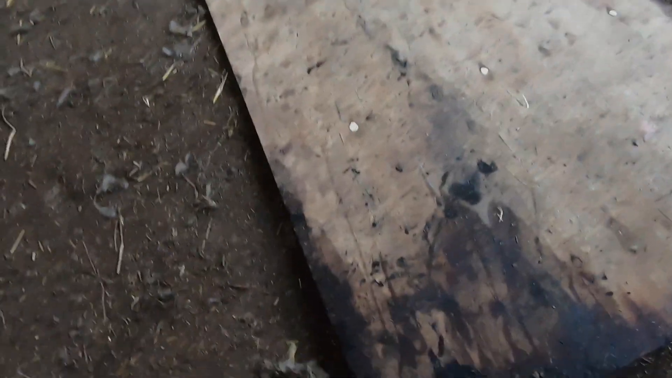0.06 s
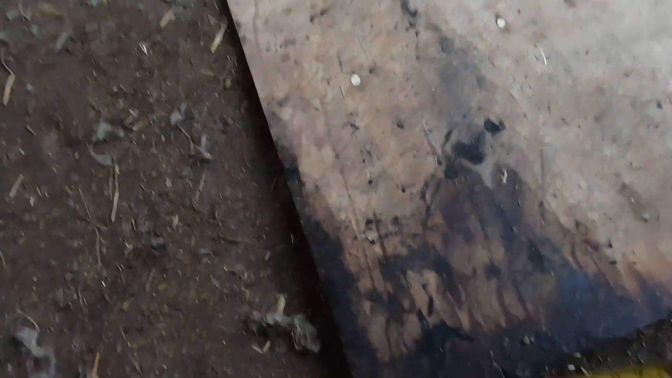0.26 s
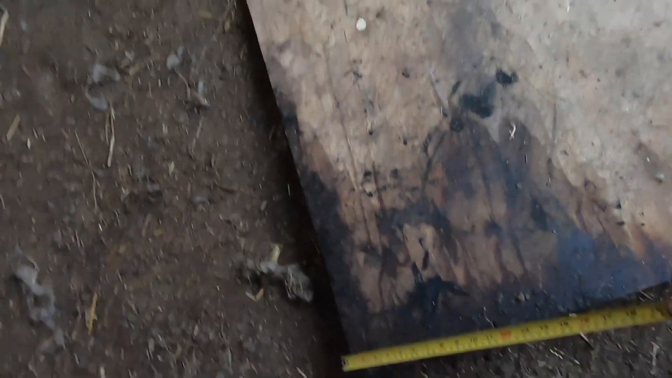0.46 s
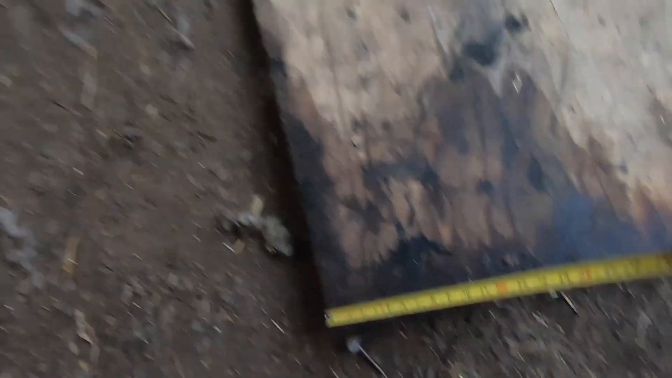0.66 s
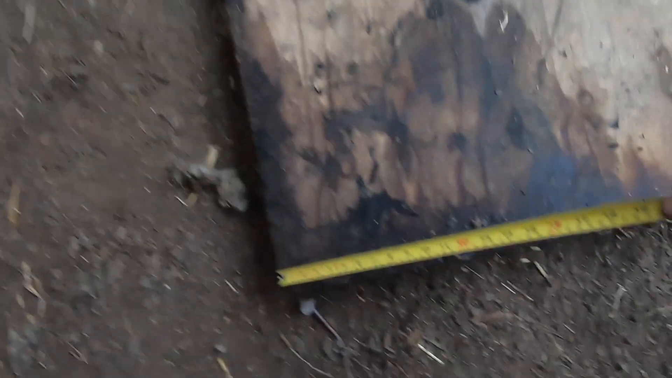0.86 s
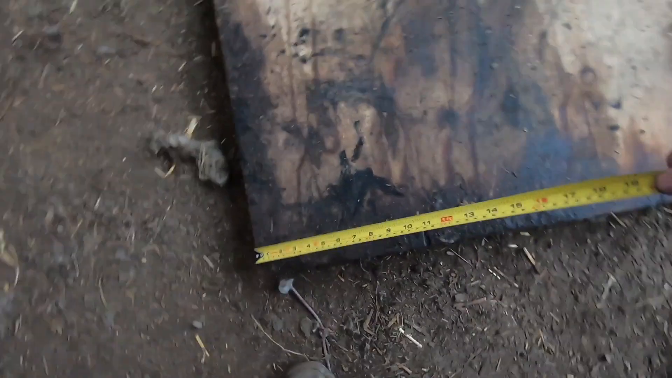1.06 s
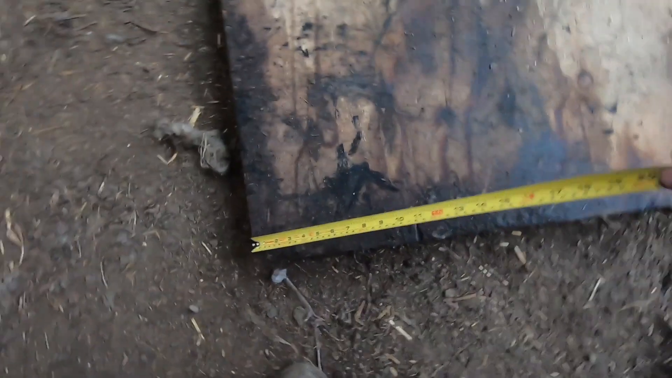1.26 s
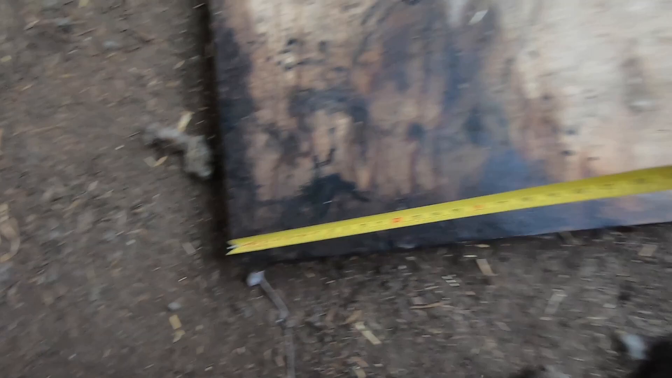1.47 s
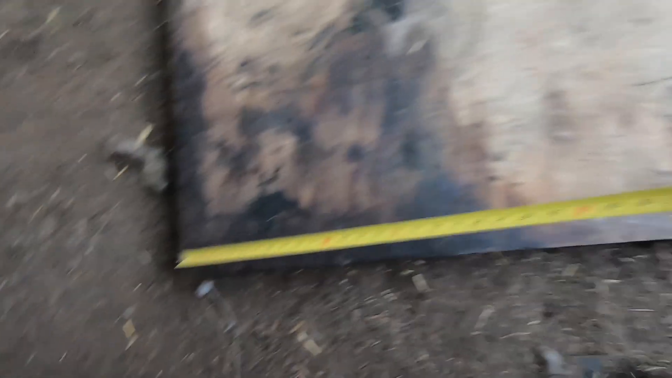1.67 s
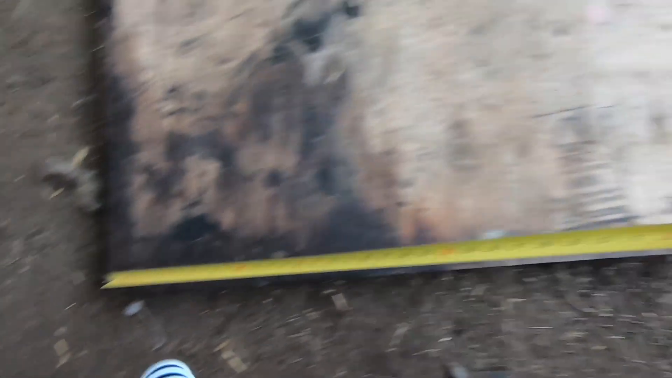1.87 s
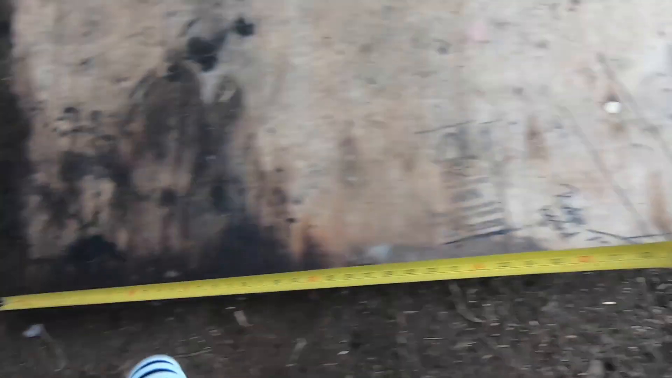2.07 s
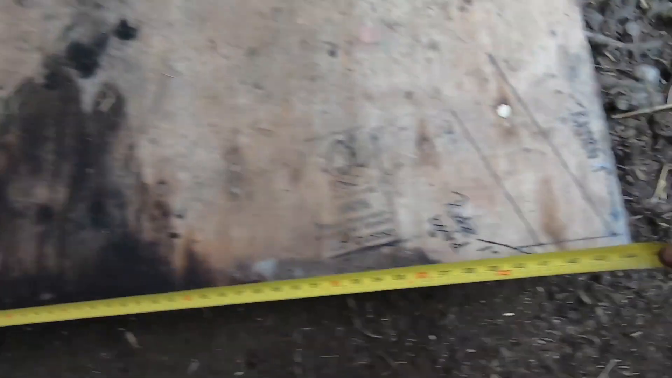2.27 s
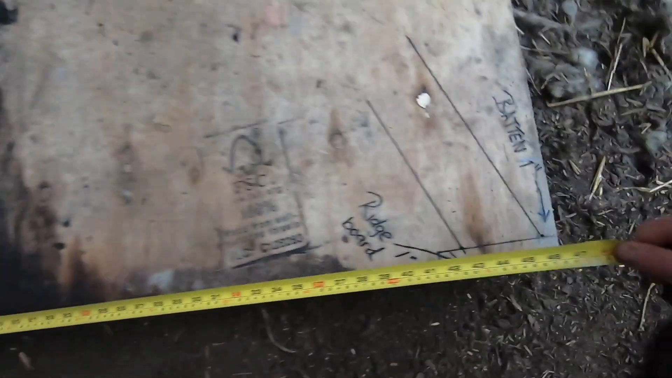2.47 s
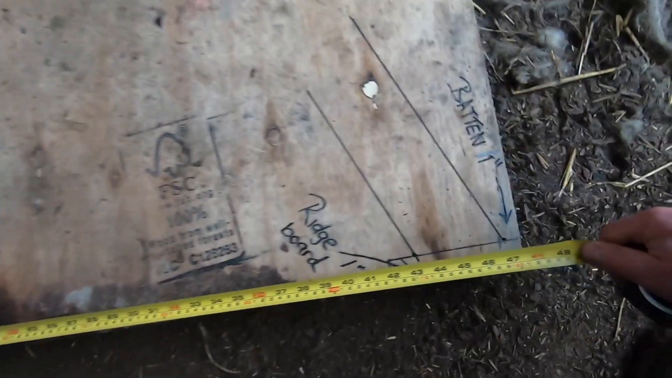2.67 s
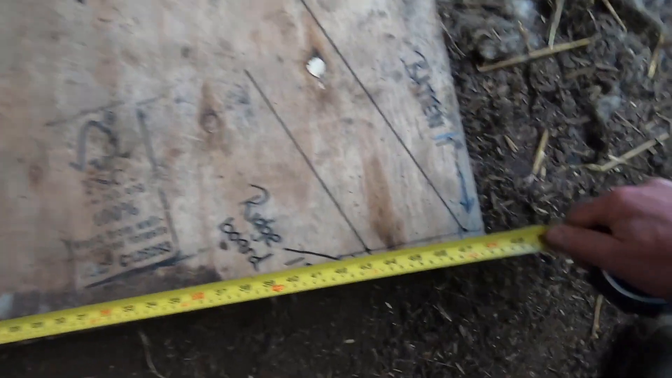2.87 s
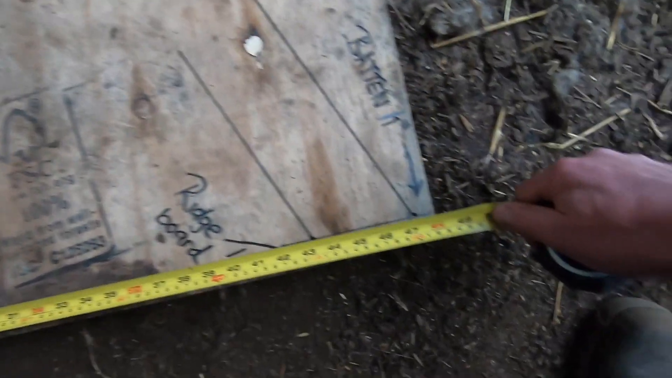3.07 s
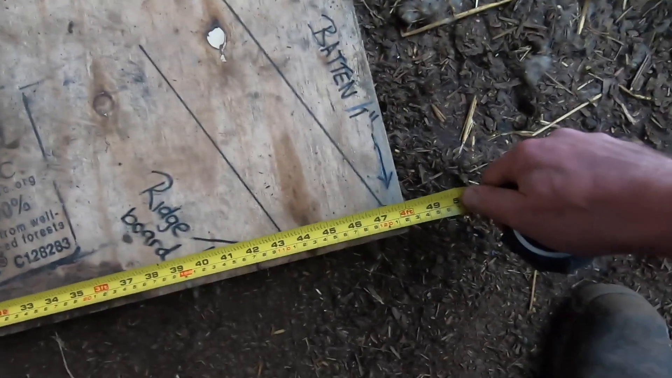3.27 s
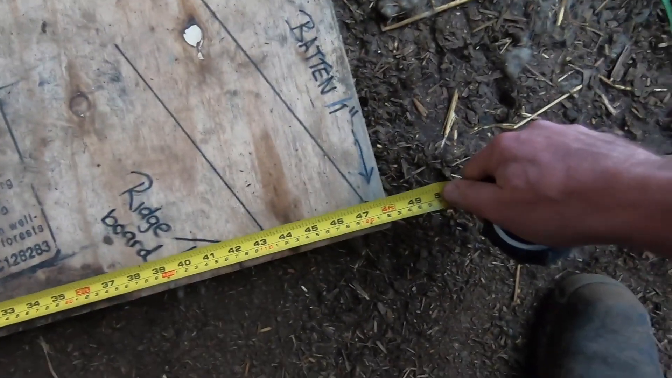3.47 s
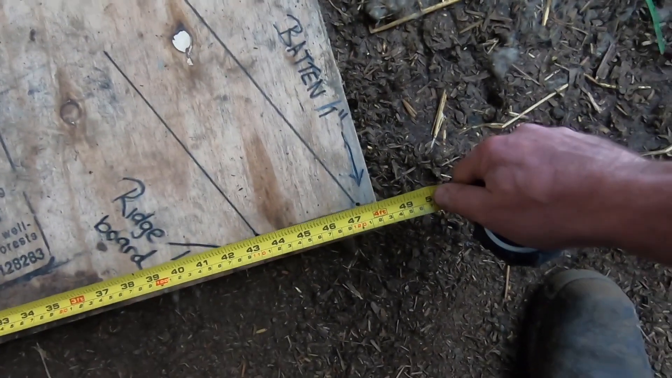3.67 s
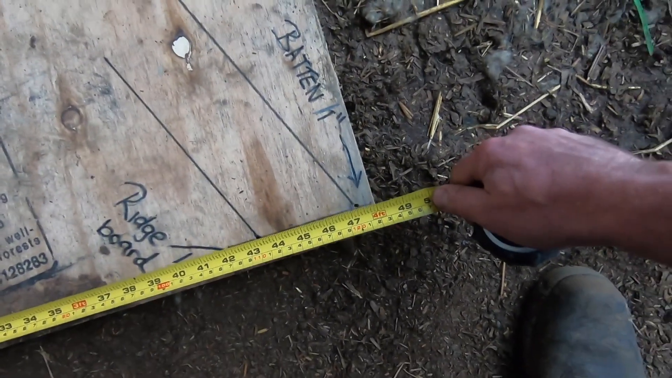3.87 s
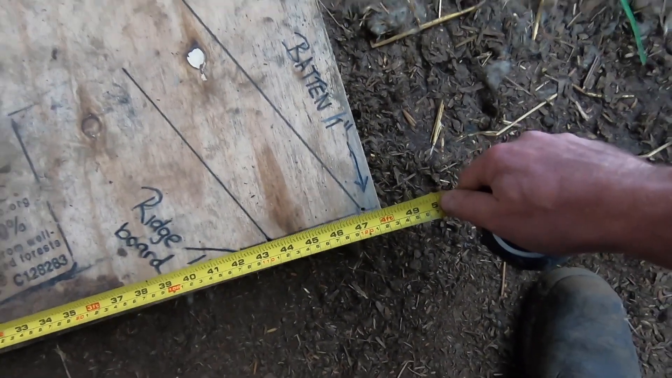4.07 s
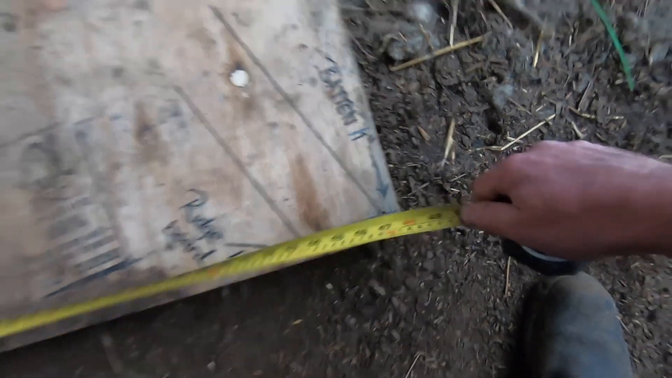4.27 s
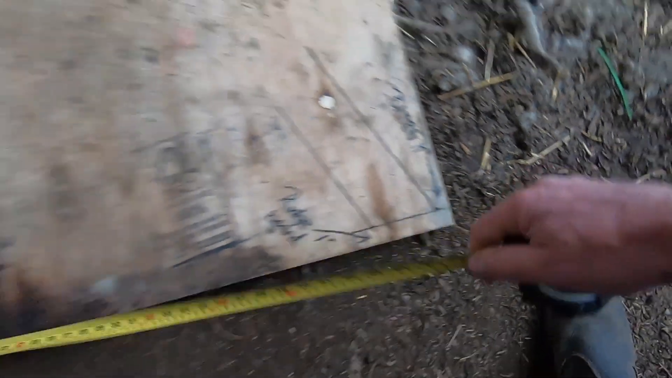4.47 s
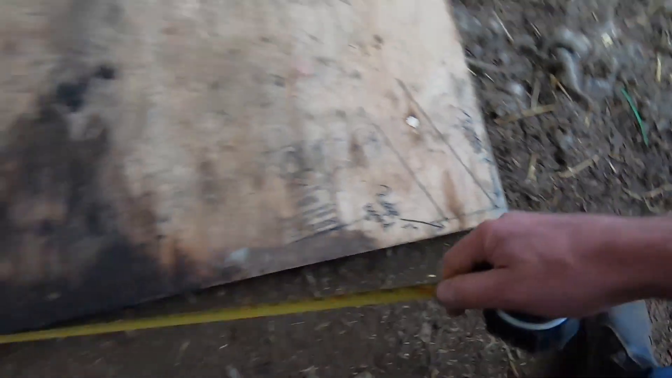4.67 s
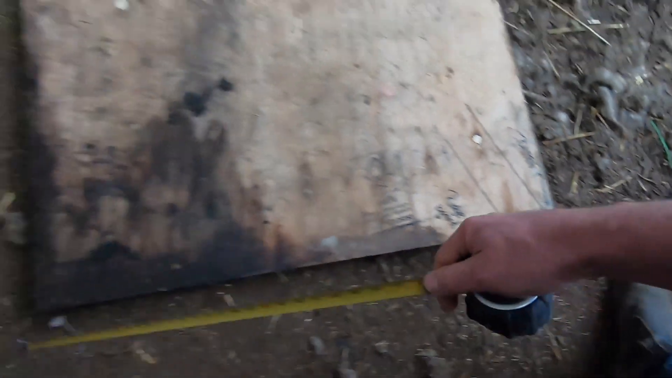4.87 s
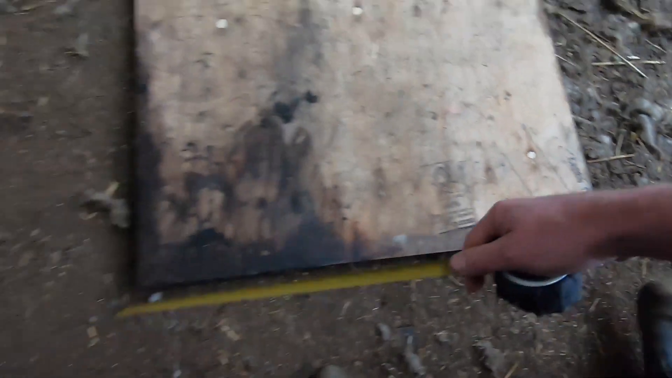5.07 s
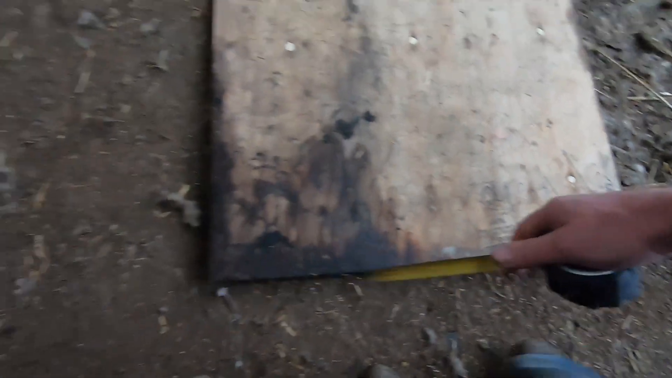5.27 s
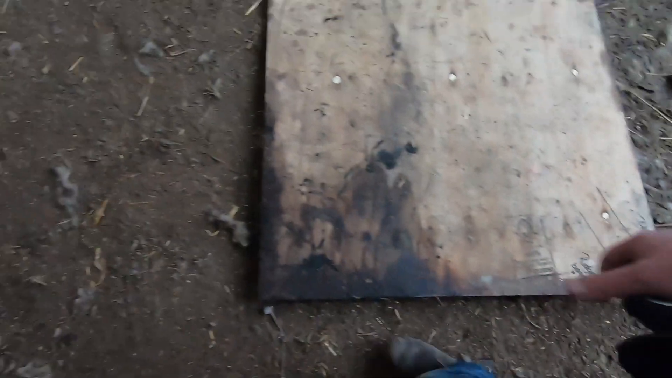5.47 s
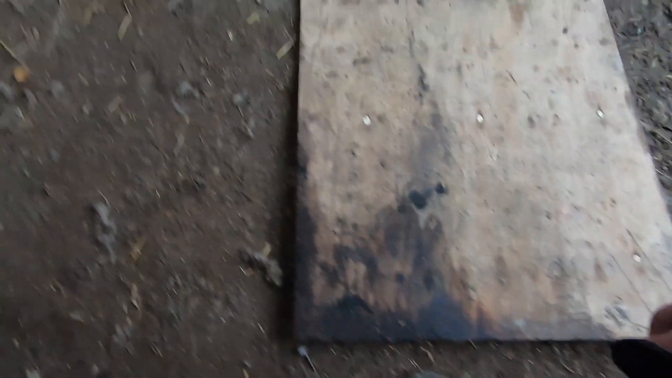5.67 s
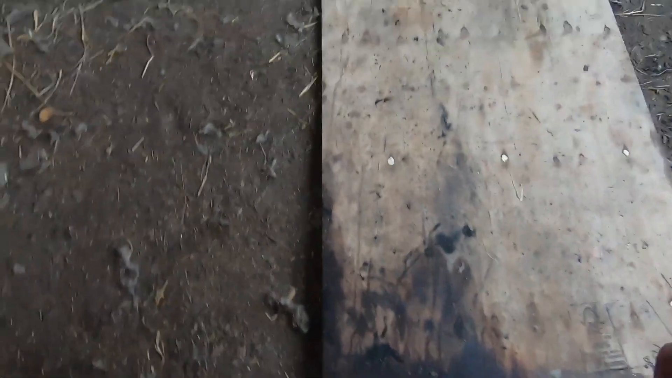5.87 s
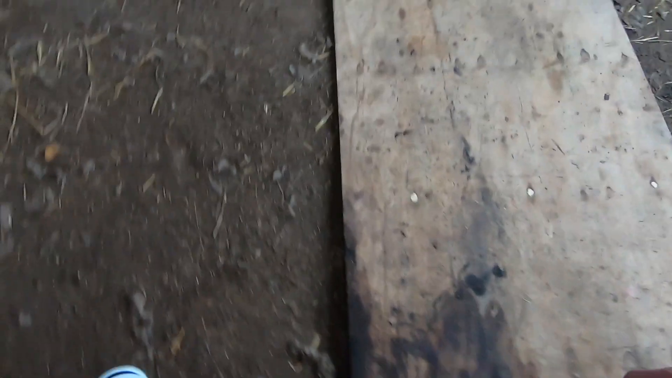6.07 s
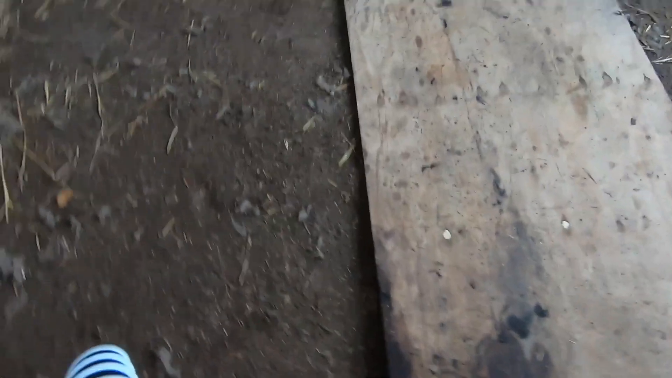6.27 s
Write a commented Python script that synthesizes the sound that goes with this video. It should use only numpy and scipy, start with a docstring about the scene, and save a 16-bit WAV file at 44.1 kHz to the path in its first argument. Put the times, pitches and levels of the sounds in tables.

```python
"""Air rumbles at two microphone ports, then a steel tape measure's blade is flicked against a board in a shed.
The blade is drawn out, held still and run back in, slapping its coils home until the hook snaps on the case.
Blade, case and hook are noise or pulses through resonances, and the snap rings on as a noise tail.
Knocks, their after-ringing and a late flutter near 450 Hz are dying sines with a woody crack.
The board is friction noise through low modes, the air is rumble, a far machine is a fluttering sine hum."""
import sys
import numpy as np
from scipy import signal
from scipy.fft import rfft, irfft
from scipy.io import wavfile
from scipy.ndimage import uniform_filter1d

SR = 44100
rng = np.random.default_rng(int(sys.argv[2]) if len(sys.argv) > 2 else 0)


def dump(signal):
    """Clip the signal to [-1, 1] and save it as 16-bit WAV at the path in sys.argv[1]."""
    limited = np.clip(np.atleast_2d(signal).T, -1, 1)
    pcm = np.round(limited * 32767).astype(np.int16)
    wavfile.write(sys.argv[1], SR, pcm)


N = 279347
T = np.arange(N) / SR
HZ = np.fft.rfftfreq(N, 1 / SR)


def gain_of(db):
    """Decibels to amplitude."""
    return 10 ** (np.asarray(db) / 20)


def evened(x):
    """Scales to rms 1."""
    return x / np.sqrt(np.mean(x ** 2) + 1e-20)


def read(points, hz):
    """Reads a spectrum table on a log-frequency axis."""
    f, value = np.transpose(points)
    return np.interp(np.log(hz + 1), np.log(f + 1), value)


def curves(rows):
    """Each column of a table after the time, sample by sample."""
    s, *columns = np.transpose(rows)
    return [np.interp(T, s, column) for column in columns]


def add(mix, s, sound):
    """Adds a sound at time s, cut at the end of the mix."""
    part = mix[..., round(s * SR):][..., :sound.shape[-1]]
    part += sound[..., :part.shape[-1]]


def ring(x, modes):
    """Passes x through parallel two-pole resonances of alternating sign."""
    total = 0
    for k, (hz, width_hz, db) in enumerate(modes):
        b, a = signal.iirpeak(hz, hz / width_hz, SR)
        total = total + (-1) ** k * gain_of(db) * signal.lfilter(b, a, x)
    return total


def drifting(x, mode, octaves):
    """One resonance whose pitch is moved by a curve in octaves."""
    hz, width_hz, db = mode
    turn = np.exp(2j * np.pi * np.cumsum(hz * 2 ** octaves) / SR)
    r = np.exp(-np.pi * width_hz / SR)
    # shift the band to 0 Hz, smooth it, shift it back
    return 2 * gain_of(db) * (turn * signal.lfilter([1 - r], [1, -r], x / turn)).real


def colour(x, points):
    """Shapes noise by a spectrum table, at rms 1."""
    return evened(irfft(rfft(x) * gain_of(read(points, HZ)), N))


def panned(pan_db):
    """Left and right gains for a left-right difference in dB."""
    return gain_of(np.array([pan_db / 2, -pan_db / 2]))


def wander(size, count):
    """Slow chance curves, one row for each of count, at rms 1 together."""
    step = 64
    slow = rng.standard_normal((count, N // step + 1))
    for _ in range(2):
        slow = uniform_filter1d(slow, size)
    return np.repeat(evened(slow), step, axis=1)[:, :N]


def grit(spread_db, lumpy_db, size):
    """Two views of dense friction: micro-slips of uneven size that come in clumps."""
    clumps = evened(uniform_filter1d(uniform_filter1d(rng.standard_normal(N), size), size))
    slip_db = spread_db * np.minimum(rng.exponential(1, N), 4)
    return rng.standard_normal((2, N)) * gain_of(slip_db + lumpy_db * clumps)


def shimmer(x, depth_db):
    """Thin modes of the blade come and go as its free length changes."""
    hz, t, z = signal.stft(x, SR, nperseg=1024, noverlap=768)
    field = rng.standard_normal(z.shape[1:])
    for _ in range(2):
        field = uniform_filter1d(field, size=3, axis=0)
        field = uniform_filter1d(field, size=9, axis=1)
    gain = gain_of(depth_db * evened(field))
    gain = gain / np.sqrt(np.mean(gain ** 2))
    return signal.istft(z * gain, SR, nperseg=1024, noverlap=768)[1][:, :N]


# Likeness of the ports. Each row: frequency in Hz, left-right likeness from 0 to 1.
PORT_LIKENESS = [(60, 0.93), (200, 0.066), (400, 0.79), (900, 0.13), (1900, 0.29), (3800, 0.55),
                 (7500, 0.062), (15000, 0.2)]
# Level balance of the ports. Each row: frequency in Hz, left-right difference in dB.
PORT_LEAN = [(60, -5), (120, -2), (240, -0.5), (480, 0.5), (950, -3.5), (1890, -3.5), (3770, 0.5),
             (7520, 3.5), (15000, -7)]
# Phase between the ports. Each row: frequency in Hz, radians the left port leads.
PORT_TURN = [(60, -0.5), (5500, 0.5), (8500, -4), (15000, 9.5)]


def ports(x):
    """Two views become left and right, alike by a share that depends on frequency."""
    a, b = rfft(x)
    same = np.clip(read(PORT_LIKENESS, HZ), 0, 1)
    lean = gain_of(read(PORT_LEAN, HZ) / 2)
    left = b * np.sqrt(1 - same ** 2) + a * same * np.exp(1j * read(PORT_TURN, HZ))
    return irfft(np.array([left, a]) * [lean, 1 / lean], N)


# Puffs of air and handling. Each row: peak time in seconds, half length in seconds, deep dB, upper dB.
AIR_PUFFS = [(0.0, 0.028, -49, -55), (.14, 0.027, -64, -77), (0.846, 0.036, -71, -58),
             (0.94, 0.11, -55.5, -87), (1.408, 0.05, -70, -56), (1.598, 0.031, -56, -46),
             (1.857, 0.19, -70, -89), (2.108, 0.029, -62, -58.5), (2.492, 0.13, -57, -60.5),
             (4.587, 0.1, -54, -62), (4.914, 0.046, -60, -72), (5.215, 0.048, -87, -90),
             (5.672, 0.022, -76, -52), (6.17, .05, -80, -65)]
# Rumble between puffs: deep level in dB, upper level in dB.
AIR_CALM_DB = [-74.5, -103]


def air():
    """Low rumble in two bands, partly shared by the ports, swelling with each puff."""
    s, half_s, *peaks_db = np.transpose(AIR_PUFFS)
    bells = np.exp(-((T[:, None] - s) / half_s) ** 2)
    bands_hz, shares = [[15, 51.6], [60, 89.5]], [.5, 1.8]
    out = 0
    for peak_db, calm_db, band_hz, shared in zip(peaks_db, AIR_CALM_DB, bands_hz, shares):
        band = signal.butter(3, band_hz, "bandpass", fs=SR, output="sos")
        a, b, c = signal.sosfilt(band, rng.standard_normal((3, N)))
        rumble = evened(np.array([shared * a + b, shared * a + c]))
        out = out + (gain_of(calm_db) + bells @ gain_of(peak_db)) * rumble
    return out


# Steady floor. Each row: frequency in Hz, relative density in dB per Hz.
FLOOR_SPECTRUM = [(110, -21.5), (180, -1), (238, -8), (261, -12), (319, -19.5), (344, -25.5), (527, -24.5),
                  (567, -42.5), (695, -14.5), (917, -19), (1040, -32), (1210, -26), (1570, -33),
                  (5520, -41), (15000, -74)]
FLOOR_DB = -64
# Far machine. Each row: time in seconds, hum level in dB.
HUM_LEVELS = [(0.0, -64.5), (0.5, -86), (0.79, -56.5), (1.25, -76.5), (1.62, -60.5), (2.4, -69.5),
              (3.05, -69), (3.5, -59.5), (4.0, -57.5), (4.18, -65.5), (4.41, -85), (4.74, -56.5),
              (5.1, -100), (5.55, -69), (6.33, -99)]
HUM_HZ, HUM_DRIFT_HZ, HUM_FLUTTER_DB = 156, 1.53, 1.0


def background():
    """A steady noise floor, and a far machine's hum: a sine fluttering in pitch and level."""
    drift, flutter = wander(size=12, count=2)
    phase = 2 * np.pi * np.cumsum(HUM_HZ + HUM_DRIFT_HZ * drift) / SR
    hum = np.sin(phase) * gain_of(HUM_FLUTTER_DB * uniform_filter1d(flutter, 200))
    floor = colour(rng.standard_normal((2, N)), FLOOR_SPECTRUM)
    return gain_of(FLOOR_DB) * ports(floor) + gain_of(curves(HUM_LEVELS)[0]) * evened(hum)


# Board and soil under the work. Each row: time in seconds, boom dB, scuffing dB.
BOARD_LEVELS = [(0.0, -66, -62), (0.7, -67.5, -68.5), (1.13, -76, -71), (1.4, -53.5, -54), (1.68, -53, -56),
                (1.87, -61.5, -60.5), (2.33, -67.5, -63), (2.71, -85, -61), (3.28, -105, -71.5),
                (3.75, -70.5, -75), (4.25, -79, -67), (4.42, -68, -59), (4.46, -65, -55),
                (4.72, -46.5, -49.5), (4.87, -63.5, -56.5), (5.48, -78, -53), (5.71, -64, -57),
                (5.92, -88, -68.5), (6.15, -60, -56), (6.33, -71, -60)]
# Low modes of the board. Each row: frequency in Hz, width in Hz, level in dB.
WOOD_MODES = [(210, 120, -2), (278, 40, -0.99)]
# Scuffing. Each row: frequency in Hz, relative density in dB per Hz.
SCUFF_SPECTRUM = [(180, -21), (300, -1), (510, -6), (950, -6.5), (1210, -5.5), (1800, -8), (3000, -15),
                  (6000, -63)]


def board():
    """The dragging shakes the board, which booms, and scuffs wood and soil."""
    boom_db, scuff_db = curves(BOARD_LEVELS)
    slips = grit(spread_db=0.0, lumpy_db=2, size=400)
    boom = evened(ring(ring(slips[0], WOOD_MODES), WOOD_MODES))
    scuff = colour(slips, SCUFF_SPECTRUM)
    return gain_of(boom_db) * boom + ports(gain_of(scuff_db) * scuff)


DRIFT_OCTAVES = .045  # rms slide of the bands as the free blade flexes
FLEX_DB = .7


def rubbed(slips, modes, centre_hz, octaves):
    """Bands near the rubbed spot lead; as the blade flexes, each swells and fades alone."""
    flex_db = FLEX_DB * wander(size=22, count=len(modes))
    drift = DRIFT_OCTAVES * wander(size=70, count=len(modes))
    sound, power = 0, 0
    for k, mode in enumerate(modes):
        hz, width_hz, db = mode
        near_db = -6 * (np.log2(hz / centre_hz) / octaves) ** 2
        band = drifting(np.roll(slips, k * 9001, axis=1), mode, drift[k])
        sound = sound + gain_of(near_db + flex_db[k]) * band
        power = power + gain_of(2 * (near_db + db)) * width_hz
    return evened(sound / np.sqrt(power))


# Sliding blade. Each row: time in seconds, blade hiss dB, case rasp dB.
SLIDE_LEVELS = [(0.0, -69, -79), (0.19, -67, -59.5), (0.33, -67, -67.5), (0.65, -67.5, -73),
                (0.83, -65.5, -59), (0.97, -75.5, -76.5), (1.2, -74, -81), (1.3, -63, -59.5),
                (1.4, -46, -56.5), (1.5, -48, -58.5), (1.74, -43, -53.5), (2.0, -47.5, -60),
                (2.5, -50, -60), (2.8, -58, -59.5), (2.93, -69.5, -71), (3.1, -74, -83), (3.5, -82, -88),
                (3.91, -82, -94), (4.09, -73.5, -74), (4.25, -79, -85), (4.39, -57.5, -58.5),
                (4.46, -48, -51.5), (4.67, -48, -53), (4.78, -43, -42.5), (4.9, -54, -57.5),
                (5.18, -52.5, -52.5), (5.35, -43.5, -47), (5.45, -46, -41.5), (5.47, -54, -53),
                (5.6, -59, -57), (5.69, -81, -66), (5.84, -75, -71), (6.08, -76, -73), (6.33, -68.5, -66)]
# Place of the tape as the hand swings across. Each row: time in seconds, left-right dB.
TAPE_PLACE = [(0, 2), (.8, 4.2), (1.4, 3), (2.5, 3.3), (4.4, 4.5), (4.75, 2.5), (5.0, 4), (5.43, 5),
              (5.55, 1.5), (6.33, 4.5)]
# Ringing bands of the blade. Each row: frequency in Hz, width in Hz, level in dB.
BLADE_MODES = [(4830, 365, 0), (5380, 530, -3), (6330, 730, -2.5), (7395, 670, 1.5)]
# Ringing bands of the case. Each row: frequency in Hz, width in Hz, level in dB.
CASE_MODES = [(1585, 1000, -0.091), (2280, 540, 1.64), (2780, 840, -0.5), (3507, 1000, -0.89),
              (4240, 410, -2.2)]
# Top treble of the blade. Each row: frequency in Hz, width in Hz, level in dB.
SIZZLE_MODES = [(10290, 1250, -23), (14150, 610, -33)]
# Narrow bands of the rubbing. Each row: time in seconds, low dB, middle dB, upper dB.
RUB_LEVELS = [(0.0, -75, -69, -75), (0.37, -74, -78, -79), (1.13, -81, -87, -82), (1.32, -86, -81, -87),
              (1.48, -75, -74, -63), (1.64, -60, -69, -65), (1.85, -72, -62, -61.5),
              (2.63, -79, -71.5, -59.5), (2.96, -86, -79, -82), (3.3, -89, -95, -86),
              (3.91, -84, -100, -92), (4.37, -97, -82, -80), (4.62, -56.5, -49.5, -54.5),
              (5.09, -74, -71, -59), (5.3, -74, -49.5, -53), (5.45, -64, -57, -56), (5.75, -82, -72, -87),
              (5.94, -76, -70, -81), (6.33, -66, -82, -73)]
# Their resonances. Each row: frequency in Hz, width in Hz, level in dB.
RUB_MODES = [(600, 200, 0), (2230, 550, 0), (3800, 700, 0)]
# Thin whine. Each row: frequency in Hz, width in Hz, level in dB.
WHINE_BANDS = [(1870, 100, 8), (2070, 110, 2), (3350, 200, -6)]
WHINE_START_S, WHINE_LENGTH_S, WHINE_START_DB, WHINE_SWELL_DB = 1.118, .27, -71, 5
# the more the hiss leads the rasp, the brighter the blade
SIZZLE_DB, SIZZLE_DB_PER_DB = -28.5, 1.84
HISS_HZ, HISS_OCTAVES_PER_DB = 6350, 0.03
# the harder the rasp, the higher its centre, up to RASP_FULL_DB
RASP_HZ, RASP_OCTAVES_PER_DB, RASP_FULL_DB = 3320, .02, -57
SPOT_OCTAVES, SPOT_PAN_DB = 0.09, 1.7  # rms wander of the rubbed spot
SHIMMER_DB = 1.8


def slide():
    """The blade rubs the lips of the case, hissing and rasping; a thin whine leads the drawing out."""
    blade_db, case_db = curves(SLIDE_LEVELS)
    lead_db = blade_db - case_db
    blade_spot, case_spot, pan_spot = wander(size=40, count=3)
    top_db = blade_db + SIZZLE_DB + SIZZLE_DB_PER_DB * lead_db
    blade_hz = HISS_HZ * 2 ** (HISS_OCTAVES_PER_DB * lead_db + SPOT_OCTAVES * blade_spot)
    short_db = np.minimum(case_db - RASP_FULL_DB, 0)
    case_hz = RASP_HZ * 2 ** (RASP_OCTAVES_PER_DB * short_db + SPOT_OCTAVES * case_spot)

    slips = shimmer(grit(spread_db=0.0, lumpy_db=-1.0, size=150), SHIMMER_DB)
    steel = gain_of(blade_db) * rubbed(slips, BLADE_MODES, blade_hz, octaves=1.1)
    sizzle = ring(ring(slips, SIZZLE_MODES), [(11100, 22000, 0)])
    steel += gain_of(top_db) * evened(sizzle)
    case_slips = np.roll(slips, SR, axis=1)
    steel += gain_of(case_db) * rubbed(case_slips, CASE_MODES, case_hz, octaves=1.0)

    drifts = DRIFT_OCTAVES * wander(size=70, count=3)
    for level_db, mode, drift in zip(curves(RUB_LEVELS), RUB_MODES, drifts):
        band = drifting(drifting(slips[:, ::-1], mode, drift), mode, drift)
        steel += gain_of(level_db) * evened(band)

    length = round(WHINE_LENGTH_S * SR)
    whine = evened(ring(rng.standard_normal((2, length)), WHINE_BANDS))
    whine_db = WHINE_START_DB + np.linspace(0, WHINE_SWELL_DB, length)
    add(steel, WHINE_START_S, gain_of(whine_db) * whine * signal.windows.tukey(length, .2))
    return steel * panned(SPOT_PAN_DB * pan_spot + curves(TAPE_PLACE)[0])


def burst(noise, hz, octaves):
    """A puff of noise rings blade and case, weighted around a centre frequency."""
    near = [(f, width_hz, db - 6 * (np.log2(f / hz) / octaves) ** 2)
            for f, width_hz, db in CASE_MODES + BLADE_MODES + SIZZLE_MODES]
    # a low blow is a soft one; thin steel moves little air below its ring
    noise = signal.lfilter(*signal.butter(2, min(4.4 * hz, 18000), fs=SR), noise)
    noise = signal.lfilter(*signal.butter(2, hz / 2, "highpass", fs=SR), noise)
    centre = ring(ring(noise, [(hz, hz / 0.72, 0)]), [(hz, hz / 0.34, 0)])
    return ring(noise, near) + gain_of(-17.0) * centre


# Clicks of blade and hook. Each row: contact time in seconds, peak in dB before panning, centre in Hz.
STEEL_CLICKS = [(0.1482, -20.5, 4740), (0.152, -25.5, 5140), (0.1595, -29, 7440), (0.164, -25, 4540),
                (0.189, -35, 5030), (0.4582, -32, 5000), (0.5445, -38, 7200), (0.658, -51, 7390),
                (0.683, -44.5, 4840), (0.7028, -41, 7300), (0.734, -35.5, 4200), (0.7471, -28, 4600),
                (0.776, -38, 7460), (0.7984, -31.5, 4200), (0.8012, -24.5, 4500), (1.1226, -54, 5070),
                (1.2767, -36, 4050), (1.3592, -41, 4410), (1.368, -34.5, 2790), (1.386, -40, 3400),
                (1.3973, -40, 2670), (1.406, -37, 3600), (1.416, -34, 4680), (1.43, -35, 3700),
                (1.5705, -41.5, 1100), (1.588, -35.5, 3000), (1.7505, -29, 2600), (1.7525, -25, 3220),
                (1.924, -43.5, 3600), (2.19, -46, 3300), (2.297, -29, 3540), (2.2995, -43, 3880),
                (2.308, -42, 3000), (2.503, -39, 4860), (2.512, -33, 4800), (3.152, -54.5, 4100),
                (3.369, -59, 3030), (4.287, -55, 1800), (4.6153, -27.5, 4630), (4.7085, -13.5, 5470),
                (4.758, -17, 4240), (4.8538, -31.5, 3680), (5.0011, -50, 3600), (5.0893, -29, 2650),
                (5.1372, -29, 3150), (5.146, -45, 3200), (5.2105, -32, 2800), (5.2215, -25.5, 3030),
                (5.228, -31, 3200), (5.2585, -28, 2930), (5.3165, -31, 2300), (5.3205, -25, 3000),
                (5.3238, -25.5, 3400), (5.359, -30, 3300), (5.364, -32, 1700), (5.8434, -45, 1400),
                (5.911, -54, 2540), (6.1257, -44, 3620)]
CLICK_T60_S, CLICK_RISE_S, CLICK_OCTAVES, CLICK_PAN_DB = 0.022, 0.00059, 0.73, 3
CLICK_TAIL_DB, CLICK_TAIL_T60_S = -10.5, 0.087  # the blade keeps buzzing after the tick
TICK_GAIN, TICK_CYCLES = 2.5, .16  # contact pulse against the buzz, and its width
CLICK_LEAD_S, CLICK_SHIMMER_DB = .001, 4
# Drags, soft slaps, ringing tails of clicks and short bands of rubbing noise. Each row: start in seconds,
# length in seconds, rms in dB before fading and panning, centre in Hz, breadth in octaves (at least 0.1 is used).
STEEL_BANDS = [(0.143, 0.018, -51, 1500, 0.41), (0.179, 0.054, -55.5, 5240, 0.9),
               (0.458, 0.048, -57.5, 4700, 0.38), (0.459, 0.031, -56.5, 7480, 0.25),
               (0.544, 0.032, -62, 4700, 0.3), (0.545, 0.03, -62.5, 7550, 0.25),
               (0.776, 0.012, -49, 5470, 1.4), (0.79, 0.015, -45, 3180, 1.1),
               (1.374, 0.058, -47.5, 2130, 1.2), (1.486, 0.0085, -45, 1800, 1),
               (1.496, 0.033, -48.5, 3340, 0.72), (1.745, 0.0058, -29, 3100, 0.96),
               (2.552, 0.15, -56.5, 2610, 0.19), (2.948, 0.081, -75, 2090, 0.33),
               (4.69, 0.017, -38, 3760, 1.1), (4.705, 0.041, -31.5, 4100, 0.89),
               (4.741, 0.04, -32, 4100, 0.7), (4.793, 0.013, -50, 2630, 0.35),
               (4.817, 0.03, -43.5, 3870, 0.32), (4.934, 0.025, -46.5, 4260, 0.66),
               (4.999, 0.016, -45.5, 2880, 0.95), (5.037, 0.021, -48.5, 4840, 0.37),
               (5.201, 0.021, -40, 2820, 1.5), (5.244, 0.031, -43, 2860, 0.6),
               (5.344, 0.027, -41, 2900, 1.1), (5.402, 0.025, -40.5, 2300, 0.77),
               (5.421, 0.01, -39, 2500, 1.1), (5.425, 0.026, -32.5, 2460, 1.3),
               (5.441, 0.029, -33.5, 3380, 2.1), (6.126, 0.051, -57.5, 2700, 0.88)]
BAND_RISE_S, BAND_FADE_S, BAND_PAN_DB = 0.0023, 0.0086, 0.5


def steel_events():
    """Clicks are a pulse and a dying buzz; drags, slaps, click tails and rubbing are short grainy bands."""
    out, t = np.zeros((2, N)), np.arange(3000) / SR
    fall = gain_of(-60 * t / CLICK_T60_S) + gain_of(CLICK_TAIL_DB - 60 * t / CLICK_TAIL_T60_S)
    shape = fall * (1 - np.exp(-(t / CLICK_RISE_S) ** 2))
    noise = shimmer(rng.standard_normal((2, N)), CLICK_SHIMMER_DB)
    for s, peak_db, hz in STEEL_CLICKS:
        tick = TICK_GAIN * np.exp(-((t - CLICK_LEAD_S) * hz / TICK_CYCLES) ** 2)
        buzz = noise[:, round(s * SR):][:, :len(t)] * shape
        click = burst(buzz + tick, hz, CLICK_OCTAVES)
        click = gain_of(peak_db) * click / abs(click).max()
        add(out, s - CLICK_LEAD_S, click * panned(CLICK_PAN_DB)[:, None])

    rough = shimmer(grit(spread_db=2.0, lumpy_db=2.0, size=60), SHIMMER_DB)
    for s, length_s, rms_db, hz, octaves in STEEL_BANDS:
        end_s = s + length_s + 2 * BAND_FADE_S
        piece = rough[:, round(s * SR):round(end_s * SR)]
        u = np.arange(piece.shape[1]) / SR
        fade = np.exp(-(np.maximum(u - length_s + BAND_FADE_S, 0) / BAND_FADE_S) ** 2)
        hold = np.minimum(u / BAND_RISE_S, 1) * fade
        band = evened(burst(piece, hz, octaves=max(octaves, .1))) * hold
        add(out, s, gain_of(rms_db) * band * panned(BAND_PAN_DB)[:, None])
    return out * panned(curves(TAPE_PLACE)[0])


# Knocks, their low after-ringing, and a flutter near 450 Hz at the end. Each row: start in seconds,
# peak in dB before filtering, pitch in Hz, t60 in seconds (at least 0.01 is used),
# woody crack relative to the swing from 0 to 1.
DYING_SWINGS = [(0.155, -32, 234, 0.16, 0.56), (0.187, -32.5, 217, 0.031, 0),
                (0.213, -44, 203, 0.069, 0.23), (.248, -47, 187, 0.15, 0.56),
                (0.464, -39, 241, 0.087, 0.55), (0.496, -45.5, 209, 0.13, 0),
                (0.548, -47.5, 234, 0.094, 0.45), (.695, -50.5, 226, 0.16, 0.2),
                (0.741, -51, 230, 0.34, 0.9), (.808, -30, 244, 0.11, 0.4), (.838, -31, 238, 0.13, 0.06),
                (1.283, -46.5, 254, 0.14, 0.93), (1.381, -37, 284, 0.14, 1),
                (1.396, -26, 222.6, 0.076, 0.5), (1.385, -48, 750, 0.027, 0.6),
                (1.416, -33, 249, 0.063, 0.4), (1.425, -36, 906, 0.038, 0.3), (1.489, -46, 270, 0.033, 1),
                (1.514, -55, 220, 0.044, .2), (1.562, -41, 227, 0.029, 0.7), (1.570, -15, 213, 0.043, 0.2),
                (1.593, -32, 243, 0.033, 1), (1.597, -43, 900, 0.02, 0.8), (1.626, -47, 300, 0.04, 0.7),
                (2.087, -44.5, 169, 0.065, 0.36), (2.322, -46.5, 250, 0.11, 0.7),
                (4.286, -49, 785, 0.049, 0.9), (4.44, -51.5, 590, 0.26, .6), (4.472, -53, 424, 0.034, 0.6),
                (4.503, -48.5, 305, 0.028, 0.9), (4.675, -40, 248, 0.076, 0.8),
                (4.705, -42, 228, 0.079, 0.7), (4.742, -39, 260, 0.064, 1), (4.775, -45, 218, 0.075, 0.2),
                (4.80, -46, 235, 0.16, 0.3), (4.851, -42, 282, 0.075, 1), (5.262, -41, 216, 0.019, 1),
                (5.427, -26.5, 785, 0.0063, 0.2), (5.458, -32.5, 234, 0.043, 1),
                (5.616, -44, 326, 0.024, 0.7), (5.65, -34, 214, 0.018, 0.06), (5.658, -44, 260, 0.03, 0.3),
                (5.881, -48, 232, 0.019, 0.4), (5.911, -42.5, 436, 0.046, 0.24),
                (5.945, -53, 463, 0.11, 0.1), (5.985, -51.5, 454, 0.23, 0.4), (6.012, -56, 463, 0.084, 0.3),
                (6.126, -32.5, 430, 0.023, 0.4), (6.129, -36.5, 167.6, 0.074, 1),
                (6.155, -40, 186, 0.046, 0.9)]
# Upper modes of the wood. Each row: frequency in Hz, width in Hz, level in dB.
CRACK_MODES = [(378, 100, -0.5), (453, 180, 2.5), (732, 220, 2), (924, 450, -2), (1386, 660, -8.5)]
CRACK_LEAD_S = .002


def knocks():
    """Knocks, after-ringing and flutter: each row is a dying swing, with a crack in the wood's upper modes."""
    swings, cracks, t = np.zeros(N), np.zeros((2, N)), np.arange(9000) / SR
    for s, peak_db, hz, t60_s, crack in DYING_SWINGS:
        fall = gain_of(-60 * t / max(t60_s, .01))
        rise = 1 - np.exp(-(t * hz / .7) ** 2)  # builds within about a cycle
        phase = 2 * np.pi * hz * t
        # neighbour modes beat with the main one
        modes = np.sin(phase) + 0.4 * np.sin(0.832 * phase) + 0.21 * np.sin(1.7 * phase)
        swing = fall * rise * modes
        crack_noise = rng.standard_normal((2, len(t))) * (fall ** 3 + 2.4 * fall ** 0.56)
        woody = ring(crack_noise, CRACK_MODES)
        add(swings, s, gain_of(peak_db) * swing / abs(swing).max())
        add(cracks, s - CRACK_LEAD_S, gain_of(peak_db) * abs(crack) * woody / abs(woody).max())
    highpass = signal.butter(2, 110, "highpass", fs=SR, output="sos")
    return signal.sosfilt(highpass, swings) + ports(cracks)


# Decay of the shed. Each row: frequency in Hz, t60 in seconds.
SHED_T60 = [(200, 0.4), (1000, 0.096), (4000, 0.11), (8000, 0.31), (14000, 0.18)]


def shed(x):
    """Reverberation: sparse taps of random sign, each band dying at its own speed."""
    taps = np.zeros((2, SR // 2))
    slots = np.arange(200, SR // 2 - 20, 20)
    at = slots + rng.integers(0, 20, (2, len(slots)))
    np.put_along_axis(taps, at, rng.choice([-1., 1.], at.shape), 1)
    hz, t, z = signal.stft(taps, SR, nperseg=256)
    fall = gain_of(-60 * t / read(SHED_T60, hz)[:, None])
    tail = signal.istft(z * fall, SR, nperseg=256)[1]
    return signal.fftconvolve(x, tail / np.linalg.norm(tail[0]), axes=1)[:, :N]


# Hook landing on the case and bouncing. Each row: time in seconds, peak in dB before panning.
HOOK_BLOWS = [(5.4565, -21), (5.4577, -3), (5.4596, -19), (5.4609, -21), (5.4628, -25)]
# Steel hook and the case it strikes. Each row: frequency in Hz, width in Hz, level in dB.
HOOK_BANDS = [(940, 840, -8.5), (1710, 640, -2), (2630, 260, 4.5), (3080, 300, 4), (3480, 340, 2),
              (4980, 260, 3), (5740, 460, -10), (6700, 350, 1), (9500, 4500, -9.5)]
HOOK_PAN_DB = -9


def hook():
    """Single hard blows, panned to the right port, ring hook and case."""
    blows, t = np.zeros(N), np.arange(2000) / SR
    snap = ring(np.exp(-(t / .00004 - 2) ** 2), HOOK_BANDS)
    for s, peak_db in HOOK_BLOWS:
        add(blows, s, gain_of(peak_db) * snap / abs(snap).max())
    lean = gain_of(read(PORT_LEAN, HZ) / 2)
    turn = np.exp(1j * read(PORT_TURN, HZ))
    return irfft(rfft(blows * panned(HOOK_PAN_DB)[:, None]) * [lean * turn, 1 / lean], N)


# Snap ringing on in the shed. Each row: frequency in Hz, width in Hz, level in dB.
TAIL_BANDS = [(1750, 970, -3.5), (2470, 680, 2), (3630, 520, 0), (4960, 1100, -11), (7160, 550, -6),
              (9240, 1500, -22.5)]
TAIL_S, TAIL_START_DB, TAIL_RISE_S = 5.462, -5, .06  # start level is relative to TAIL_DB
TAIL_DB, TAIL_HOLD_S, TAIL_T60_S = -39, 0.096, 0.56


def snap_tail():
    """The snap rings on in the shed: noise through resonances swells briefly, holds, then dies."""
    u = T - TAIL_S
    swell_db = TAIL_START_DB * np.clip(1 - u / TAIL_RISE_S, 0, 1)
    fall_db = -60 * np.maximum(u - TAIL_HOLD_S, 0) / TAIL_T60_S
    tail = evened(ring(rng.standard_normal((2, N)), TAIL_BANDS))
    return (u > 0) * gain_of(TAIL_DB + swell_db + fall_db) * tail


SHED_DB = -19.0


def scene():
    """Tape, board, air and background; steel events, knocks and hook also excite the shed."""
    hits = ports(steel_events()) + knocks() + hook()
    steady = ports(slide() + snap_tail())
    return hits + gain_of(SHED_DB) * shed(hits) + steady + board() + background() + air()


# Microphone response. Each row: frequency in Hz, gain in dB.
MIC_RESPONSE = [(60, -2), (9000, 0), (12500, -4), (14000, -10.5), (15600, -24)]
EDGE_HZ = 15600


def record(dry):
    """The microphone loses the top treble, the input rounds off the snap; then the band limit."""
    dull = irfft(rfft(dry) * gain_of(read(MIC_RESPONSE, HZ)), N)
    lowpass = signal.firwin(511, EDGE_HZ, window=("kaiser", 9), fs=SR)
    return signal.oaconvolve(np.tanh(dull), lowpass[None], "same")


dry = scene()
out = record(dry)
dump(out)
```